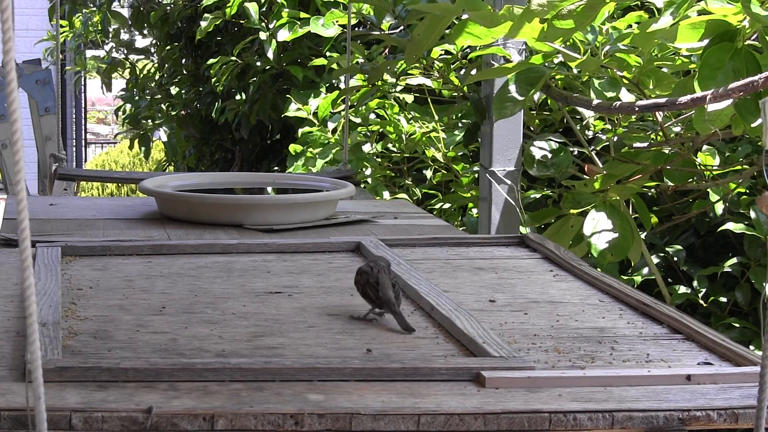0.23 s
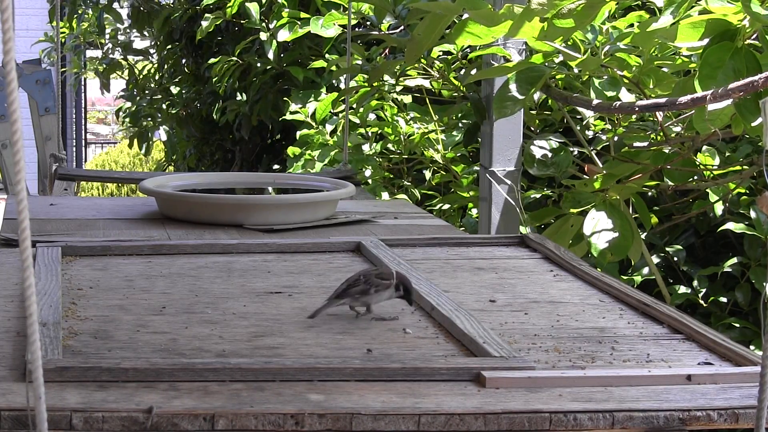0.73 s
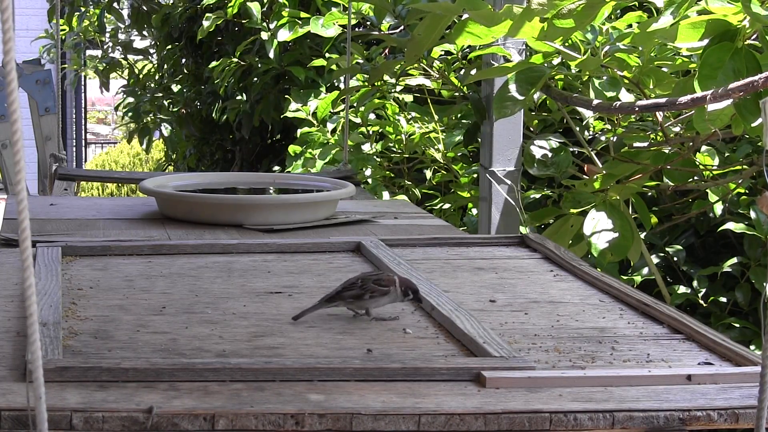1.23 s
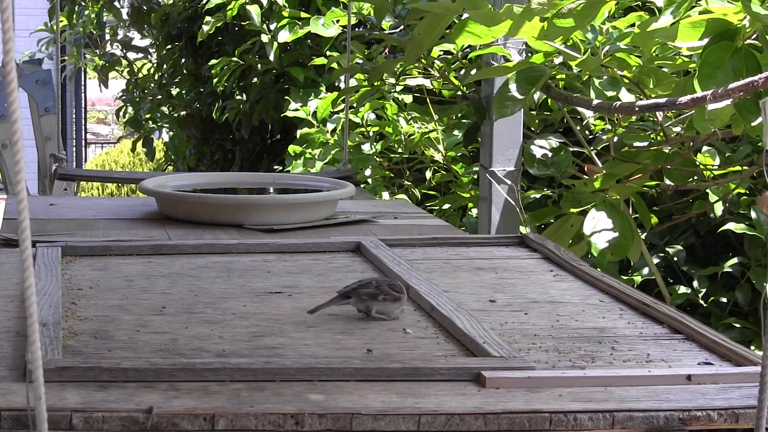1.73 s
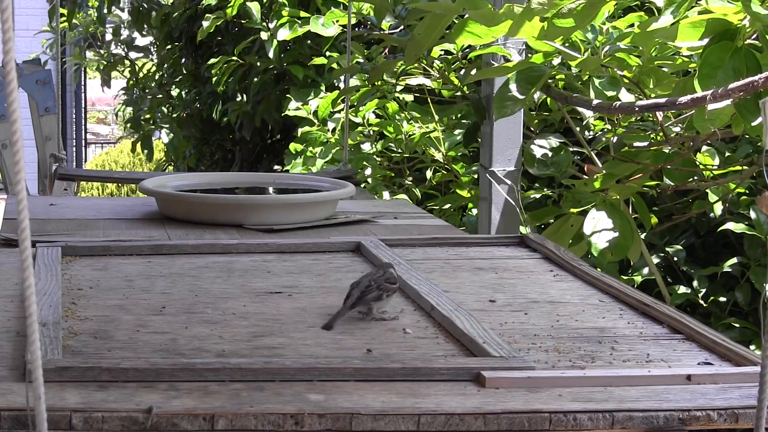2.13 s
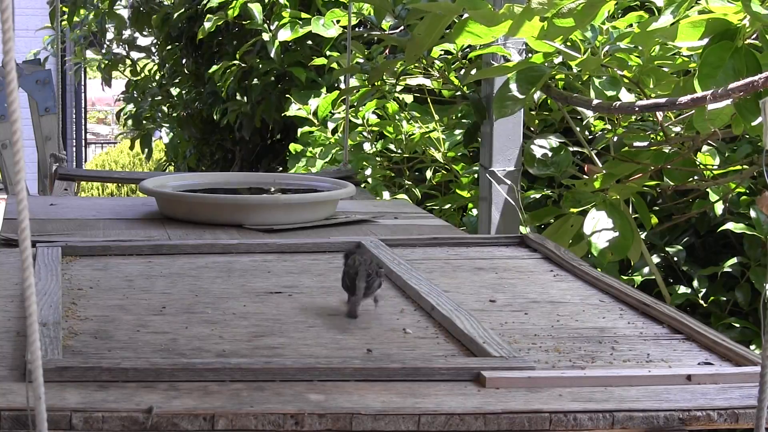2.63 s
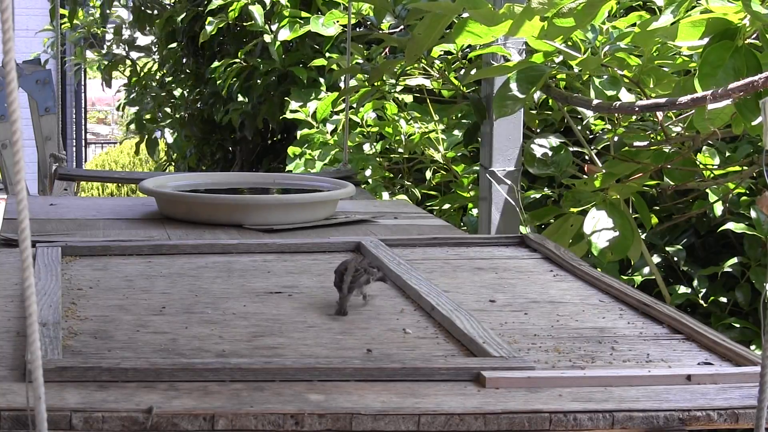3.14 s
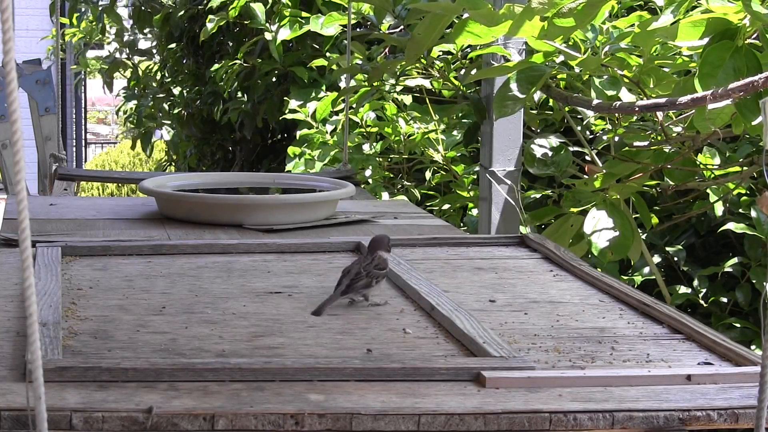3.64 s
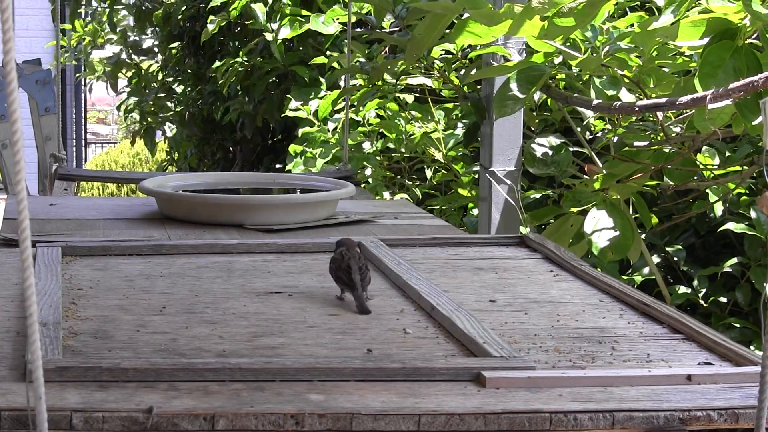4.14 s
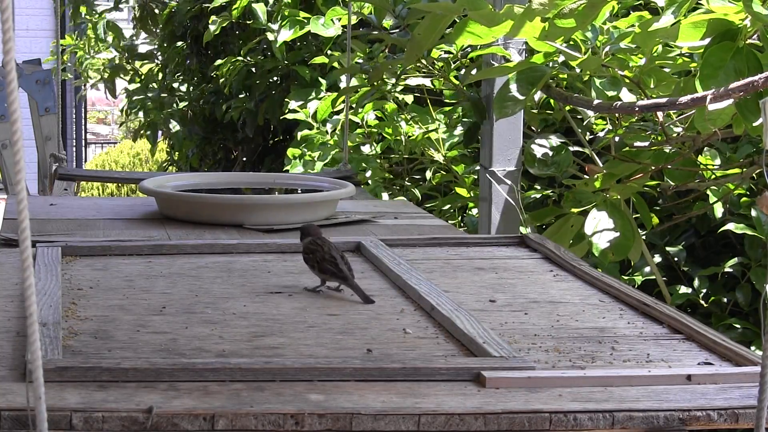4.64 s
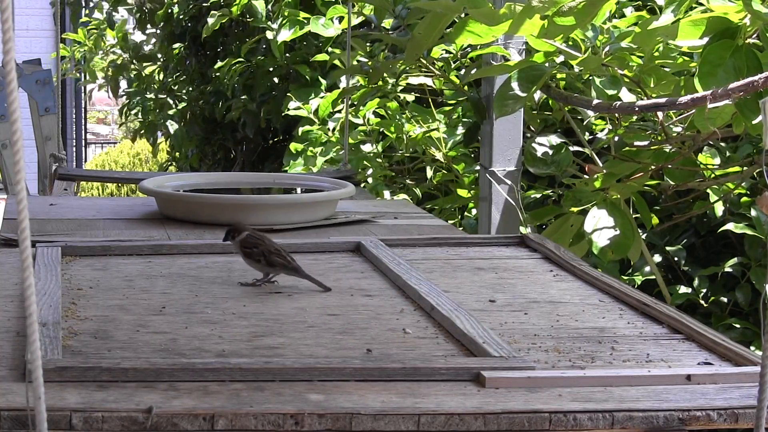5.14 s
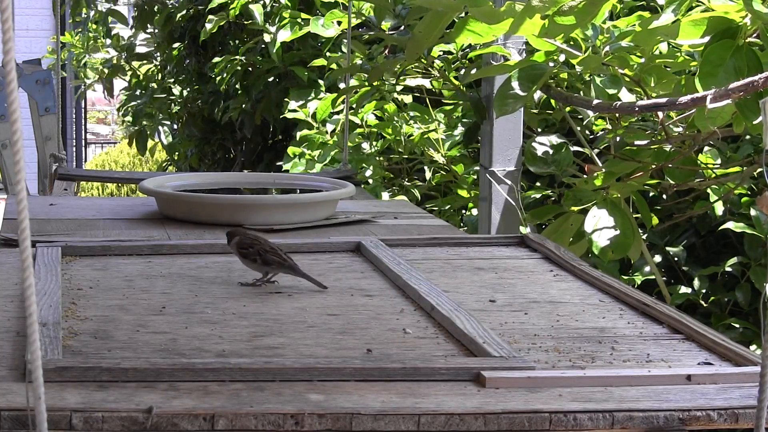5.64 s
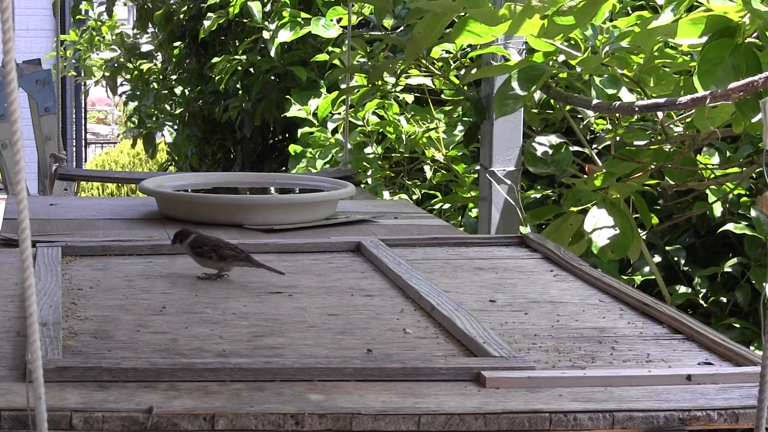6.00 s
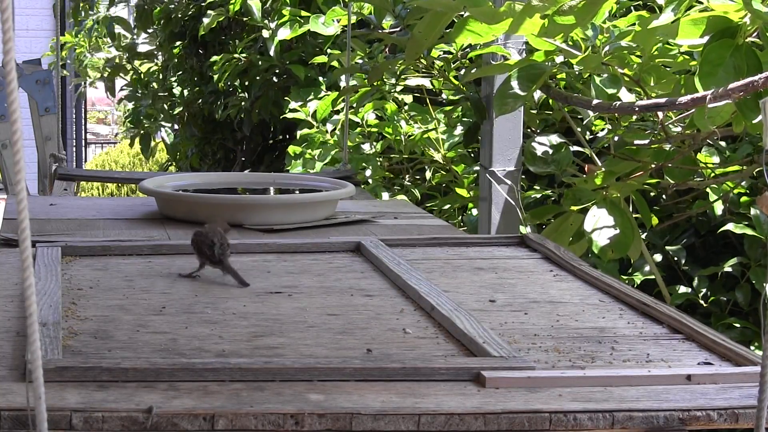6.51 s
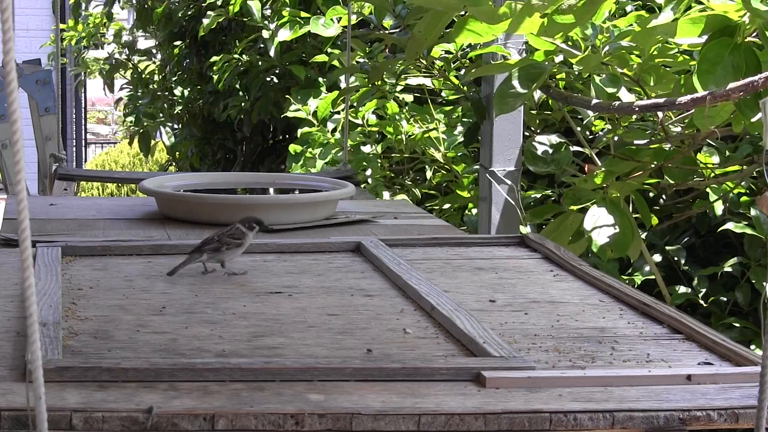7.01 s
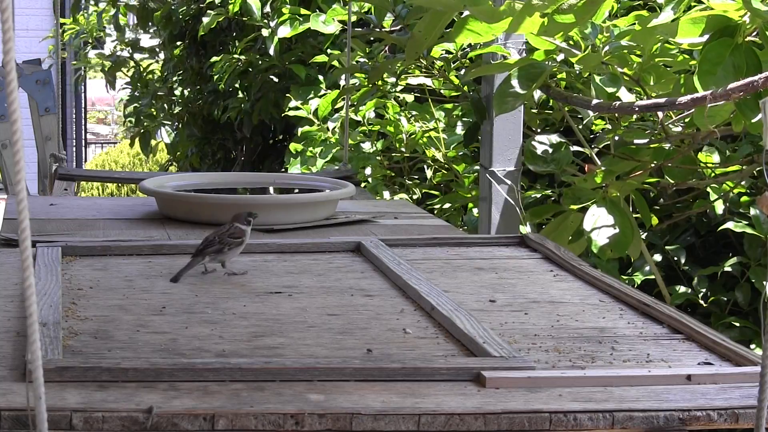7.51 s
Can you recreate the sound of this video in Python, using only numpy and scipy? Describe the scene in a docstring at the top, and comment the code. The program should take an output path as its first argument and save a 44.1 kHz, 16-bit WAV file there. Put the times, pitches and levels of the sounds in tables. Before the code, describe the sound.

A small sparrow gives six short, sharp, raspy chirps on a wooden garden hatch, with faint hopping taps and distant birds over soft traffic hush.

```python
"""Tree sparrow on a wooden hatch

A tree sparrow hops and pecks on a wooden hatch on a garden porch, giving six sharp chirps that ring between the boards.
Each chirp adds two rough gliding voices, one from each side of the syrinx (the bird's voice organ).
Other birds answer from the garden with one such voice each, mostly scattered. Taps are ringing wood and noise.
Behind them, shaped noise makes a low rumble, a swelling wash of far traffic and leaf hiss.
A pure tone makes a faint thin whine that dies away."""
import sys
import numpy as np
from scipy import signal
from scipy.fft import rfft, irfft, next_fast_len
from scipy.io import wavfile
from scipy.ndimage import map_coordinates

SR = 44100
rng = np.random.default_rng(int(sys.argv[2]) if len(sys.argv) > 2 else 0)


def inscribe(sig):
    """Save sig as 16-bit PCM at rate SR to the path in sys.argv[1].

    A 1-D sig is mono; a 2-D sig holds one channel per row.
    Samples are clipped to [-1, 1] before scaling.
    """
    pcm = np.round(np.clip(np.atleast_2d(sig).T, -1, 1) * 32767)
    wavfile.write(sys.argv[1], SR, pcm.astype(np.int16))


N = 342216  # length of the scene [samples]

# Rumble, traffic and leaf colours: (frequency [Hz], level [dB])
RUMBLE_COLOUR = [(20, -27.5), (33, -12.5), (50, -1), (85, 0), (135, 1.5), (250, -7.5), (500, -18),
                 (1500, -50)]
TRAFFIC_COLOUR = [(25, -34.5), (80, -10.5), (280, 3.5), (450, -2.5), (800, -1.5), (1400, -7), (2500, -17.5),
                  (5000, -22), (12000, -46.5)]
LEAF_COLOUR = [(60, -30), (500, -9.5), (2000, 4), (4000, 2), (6500, -1.5), (10000, -5), (13000, -7.5),
               (16000, -12)]
# How alike left and right are in all stereo noise: (frequency [Hz], likeness [0 to 1])
LEFT_RIGHT_LIKENESS = [(50, 0.97), (120, 0.99), (300, 0.56), (1000, 0.74), (4000, 0.77), (12000, .62)]
# Swells of the background: (peak time [s], half-length [s], rise [dB])
RUMBLE_SWELLS = [(3.7, .8, 3.9)]
TRAFFIC_SWELLS = [(2.7, 0.29, 2.2), (6.8, 2.1, 6.27)]
LEAF_GUSTS = [(0, .2, 4.5), (4.75, 0.85, 4.7), (7.3, 2, 3.8)]

# Beak and claws on the hatch; thump and tick are relative to the knock, before the trims in taps():
# (time [s], level [dB], thump [dB], tick [dB])
TAPS = [(0.2425, -53, -20, -7), (0.8242, -52.5, -9, -6.5), (1.5624, -43.5, -18, -19.5),
        (1.764, -46.5, -4, -18), (2.2873, -47, -8, -12.5), (3.041, -43, -13, -21.5),
        (3.3375, -47.5, 2.5, -17), (4.345, -40.5, -2.5, -17), (4.603, -53, -15, -5),
        (4.9664, -38.5, -2.5, -19), (5.928, -45, -3, -9.5), (5.995, -40.5, -3, -26),
        (6.381, -41.5, -7, -17), (6.8995, -40.5, 5.5, -35), (7.4214, -51.5, -11, -3)]
# Ringing tones of the wooden hatch: (frequency [Hz], level [dB], time to fall 60 dB [s])
HATCH_TONES = [(260, 1, 0.13), (310, -2, 0.19), (406, -4.5, 0.12), (457, -2, 0.088), (759, -13, .05),
               (1054, -9.5, .06), (1850, -10, 0.054)]
# Colours of the board's knock and the surface tick: (frequency [Hz], level [dB])
KNOCK_COLOUR = [(60, -40), (300, -4.5), (900, 0.5), (2000, 0), (3500, -5.5), (6000, -16.5), (15000, -35.5)]
TICK_COLOUR = [(200, -60), (1000, -25.5), (4000, -3.5), (8000, 3.5), (13000, -3), (16000, -6.5)]
# How long echoes last on the porch and in the garden: (frequency [Hz], time to fall 60 dB [s])
PORCH_DECAY = [(200, 0.22), (2000, 0.16), (3500, 0.15), (7000, 0.16), (14000, 0.12)]
GARDEN_DECAY = [(200, .4), (3800, 0.49), (7000, 0.26), (14000, .15)]

# Near calls of two kinds; the echo is relative to the call, the pan is left over right, the upper voice is
# relative to the lower, the swell is the rise over the call, and the fall is an extra drop in pitch:
# (time [s], level [dB], length [ratio], pitch [ratio], echo [dB], pan [dB], upper voice [dB],
#  swell [dB], fall [octaves])
CHIRPS = [(.331, -13, 1.008, 1.001, -7, 2.5, -2.5, -4, .01),
          (3.779, -19, 0.985, 0.97, -1.5, 0.9, -1.5, 3, 0.036),
          (6.520, -17, .985, 1.005, -2, 0.5, 2, -3.5, .02)]
CHIPS = [(2.669, -19, 1.01, 0.98, -3.5, 1.1, 0.35, -5, 0.01),
         (5.286, -22, 0.91, 1.037, -1, 1.1, 1, 5, -0.038),
         (7.665, -17, 1.03, 1.045, -3.5, 1.17, .5, -4, .12)]
# Turning points of the leading partial, before each call's stretch and pitch: (time from start [s], frequency [Hz])
CHIRP_GLIDE = [(.021, 4000), (.028, 5750), (.036, 6150), (.044, 4480), (.054, 3430), (.065, 3520),
               (.075, 4500), (.080, 3480), (.085, 3280), (.092, 2450), (.102, 3200), (.121, 1810)]
CHIP_GLIDE = [(0, 1951), (.016, 3830), (.023, 2463), (.028, 3370), (.037, 3658), (.047, 3030), (.061, 1753),
              (.078, 1170)]
TWEET_GLIDE = [(0, 3153), (.027, 2557), (.07, 3900), (.085, 3610)]
# The other side of the syrinx glides higher and more plainly: (time from start [s], frequency [Hz])
CHIRP_UPPER_GLIDE = [(0, 7100), (.026, 6350), (.053, 5200), (.091, 4350), (.116, 2850)]
CHIP_UPPER_GLIDE = [(0, 3060), (.012, 4750), (.033, 4206), (.056, 3780), (.066, 2200), (.075, 1510)]
# Short pushes of air in the lower voice, before the call's stretch: (time from start [s], rise [dB])
CHIRP_ACCENTS = [(.034, 8.5), (.045, 11.5), (.053, 5), (.071, 10.5), (.082, 17), (.101, 11.5)]
CHIP_ACCENTS = [(.016, 8), (.030, 10), (.037, 16), (.047, 11)]
# Harmonics 1 to 6 of a voice, the second leading, before throat and undertone: (level [dB])
PURE = [-40, 0, -19.5, -14, -33.5, -44]
REEDY = [-18, 2.5, -22.5, -22, -32, -29]
HOARSE = [-5, 1, -18, -22, -30, -30]
# How freely the fundamental sounds, before trim and wobble: (leading frequency [Hz], level [dB])
UNDERTONE = [(2800, 1), (3400, -7.5), (4300, 3), (5300, -18)]
# What the throat and open beak let through: (frequency [Hz], level [dB])
THROAT = [(500, -32.5), (1200, -9), (2000, -7), (3200, -3.5), (4400, -2.5), (5200, -7), (6200, -8.5),
          (7000, -14), (10000, -16.5), (15000, -24.5)]
# Colour of the air in a call: (frequency [Hz], level [dB])
RASP_COLOUR = [(800, -25.5), (2500, -4), (4000, 5), (6000, -4), (9000, -9.5), (12500, -16), (16000, -25.5)]

# Soft scuffs: (time [s], length [s], level [dB])
SCUFFS = [(.83, .15, -62), (1.553, 0.15, -55.5), (2.372, .29, -53), (5.21, 0.06, -54.5)]
# Colour of a scuff: (frequency [Hz], level [dB])
SCUFF_COLOUR = [(40, -50), (180, 1), (350, -1), (600, 4.5), (1200, -3.5), (1800, -1), (2600, -8.5),
                (3500, -18.5), (8000, -37)]

# Far calls: (time [s], level [dB], length [ratio], pitch [ratio])
FAR_CHIRPS = [(1.568, -44.5, 1.1, 1.03), (3.955, -44.5, 1.1, 1.06)]
FAR_TWEETS = [(2.085, -66, 0.88, 1.06), (5.59, -52, 1.03, 1.001), (7.04, -54.5, 1.01, 1.001)]

# Voice settings; times are before the call's stretch, jitter is the pitch tremble as a fraction,
# and shimmer is the loudness tremble
CHIRP_LOW = dict(glide=CHIRP_GLIDE, accents=CHIRP_ACCENTS, partials=REEDY, attack_s=.003, hold_db=-13,
                 release_s=.011, jitter=.022, shimmer_db=2.5, rasp_db=-24.5)
CHIRP_HIGH = dict(glide=CHIRP_UPPER_GLIDE, accents=[], partials=PURE, attack_s=.058, hold_db=-12,
                  release_s=.028, jitter=.06, shimmer_db=3, rasp_db=-20)
CHIP_LOW = dict(glide=CHIP_GLIDE, accents=CHIP_ACCENTS, partials=PURE, attack_s=.0133, hold_db=-11,
                release_s=.028, jitter=.0308, shimmer_db=2.7, rasp_db=-25.5)
CHIP_HIGH = dict(glide=CHIP_UPPER_GLIDE, accents=[], partials=PURE, attack_s=.017, hold_db=-8,
                 release_s=.017, jitter=.052, shimmer_db=3.5, rasp_db=-21)
FAR_CHIRP = dict(glide=CHIRP_GLIDE[:8], accents=[], partials=PURE, attack_s=.0031, hold_db=1.5,
                 release_s=.0036, jitter=.065, shimmer_db=1.5, rasp_db=-18)
FAR_TWEET = dict(glide=TWEET_GLIDE, accents=[], partials=HOARSE, attack_s=.01, hold_db=.3,
                 release_s=.017, jitter=.13, shimmer_db=3, rasp_db=-12)
ACCENT_S, FADE_DB = .0034, 15  # half-length of an air push; depth of each attack and release
CALL_S, TAIL_S = .16, .45  # time set aside for a call, and for its echo after it
RUMBLE_DB, TRAFFIC_DB, LEAVES_DB = -61, -61, -65  # resting levels, before swells, wavering and tilt
WHINE_HZ, WHINE_DB, WHINE_END_S, WHINE_FADE_DB_PER_S = 12769, -82.5, 4.5, 25  # the fade begins at WHINE_END_S
TOP_HZ = 15800  # nothing at or above this is kept


def amp(db):
    """Turn decibels into a multiplier."""
    return 10 ** (np.asarray(db) / 20)


def unit(x):
    """Scale x to an average strength (rms) of 1."""
    return x / np.sqrt(np.mean(x ** 2) + 1e-20)


def along(points, hz):
    """Read a curve of (Hz, value) points, joined by straight lines on a log frequency axis."""
    f, value = np.transpose(points)
    return np.interp(np.log(hz + 1), np.log(f + 1), value)


def wobble(rate, size):
    """Draw a smooth random curve through rate random points a second."""
    knots = rng.standard_normal(int(size * rate / SR) + 4)
    return map_coordinates(knots, [np.arange(size) * rate / SR])


def filtered(x, response):
    """Make each frequency of x stronger or weaker by response(hz)."""
    n = x.shape[-1]
    padded = next_fast_len(n + 8192)
    hz = np.fft.rfftfreq(padded, 1 / SR)
    return irfft(rfft(x, padded) * response(hz), padded)[..., :n]


def add(out, s, x):
    """Mix x into out from time s on."""
    i = max(round(s * SR), 0)
    out[:, i:i + x.shape[-1]] += x[..., :max(N - i, 0)]


def noise(colour, size):
    """Make coloured noise of rms 1 whose left and right are partly alike."""
    def response(hz):
        turn = np.arccos(np.clip(along(LEFT_RIGHT_LIKENESS, hz), -1, 1)) / 2
        return amp(along(colour, hz)) * [np.cos(turn), np.sin(turn)]  # shares for mid and side
    mid, side = filtered(rng.standard_normal((2, size)), response)
    return unit(np.array([mid + side, mid - side]))


def echo(x, decay, width, gap):
    """Smear x with fading stereo noise: a scattered answer as strong as x and gap seconds late."""
    hz, t, grains = signal.stft(rng.standard_normal((2, SR // 2)), SR, nperseg=256)
    fading = grains * amp(-60 * t / along(decay, hz)[:, None])
    mid, side = signal.istft(fading, SR, nperseg=256)[1]
    tail = np.pad([mid + width * side, mid - width * side], ((0, 0), (int(abs(gap) * SR), 0)))
    answer = signal.fftconvolve(np.atleast_2d(x), tail, axes=1)[:, :x.shape[-1]]
    return unit(answer) * np.sqrt(np.mean(x ** 2))


def bell(t, peak, width):
    """Rise smoothly to 1 at the peak and fall back."""
    return np.exp(-((t - peak) / width) ** 2)


def swells(rows, t):
    """Add up the rises in dB of a table of swells."""
    return sum(db * bell(t, peak, width) for peak, width, db in rows)


def background():
    """Rumble, far traffic and leaves are noises that waver separately; a thin whine dies away."""
    t = np.arange(N) / SR
    rumble_db = RUMBLE_DB + swells(RUMBLE_SWELLS, t) + 1.2 * wobble(11, N)
    traffic_db = TRAFFIC_DB + swells(TRAFFIC_SWELLS, t) + .45 * wobble(3.3, N)
    leaves_db = LEAVES_DB + swells(LEAF_GUSTS, t) + .3 * wobble(5, N)
    rumble = amp(rumble_db) * noise(RUMBLE_COLOUR, N)
    traffic = amp(traffic_db) * noise(TRAFFIC_COLOUR, N)
    leaves = amp(leaves_db) * noise(LEAF_COLOUR, N)
    whine_db = WHINE_DB - WHINE_FADE_DB_PER_S * np.maximum(t - WHINE_END_S, 0)
    whine = amp(whine_db) * np.sqrt(2) * np.sin(2 * np.pi * WHINE_HZ * t)
    tilt = amp([[-.5], [.5]])  # slightly stronger on the right
    return (rumble + traffic) * tilt + leaves + whine


def taps():
    """Each peck or hop ticks on the surface, knocks the board and makes the whole hatch ring."""
    out, t = np.zeros((2, N)), np.arange(SR // 3) / SR
    for s, db, thump_db, tick_db in TAPS:
        ring = 0
        for hz, level, t60 in HATCH_TONES:
            start_phase = rng.uniform(0, 2 * np.pi)
            ring = ring + amp(level - 60 * t / t60) * np.sin(2 * np.pi * hz * t + start_phase)
        thump = amp(thump_db - 8) * ring * (1 - np.exp(-t / .0014))  # soft start
        knock = amp(-6.5 - 60 * t / .06) * noise(KNOCK_COLOUR, len(t))
        tick = amp(tick_db + 3.5 - 60 * t / .033) * noise(TICK_COLOUR, len(t))
        hit = amp(db) * (thump + knock + tick)
        add(out, s, hit + amp(-4.5) * echo(hit, PORCH_DECAY, width=.4, gap=.004))
    return out


def voice(length, pitch, glide, accents, partials, attack_s, hold_db, release_s, jitter, shimmer_db, rasp_db):
    """One side of the syrinx: a trembling harmonic glide shaped by the throat, with a rasp of air."""
    t = np.arange(int(CALL_S * SR)) / SR / length
    turns, turn_hz = np.transpose(glide)
    hz = pitch * np.interp(t, turns, turn_hz) * (1 + jitter * wobble(800, len(t)))
    phase = 2 * np.pi * np.cumsum(hz) / SR

    since, left = t - turns[0], turns[-1] - t
    gate = np.clip(np.minimum(since, left) / .003, 0, 1)  # silent outside the glide
    fade = np.clip(1 - since / attack_s, 0, 1) + np.clip(1 - left / release_s, 0, 1)
    pushes_db = sum(db * bell(t, s, ACCENT_S) for s, db in accents)
    effort_db = hold_db - FADE_DB * fade + pushes_db

    # the fundamental comes and goes, and weakens on the highest notes
    under_db = along(UNDERTONE, hz) + 4.5 * wobble(250, len(t)) - 1.2
    tone = 0
    for k, level in enumerate(partials, 1):
        partial_hz = k / 2 * hz  # hz belongs to the second harmonic
        level_db = level + (k == 1) * under_db + along(THROAT, partial_hz)
        tone = tone + amp(level_db) * (partial_hz < SR / 2) * np.sin(k / 2 * phase)
    air = amp(rasp_db) * noise(RASP_COLOUR, len(t))[0]
    loudness = amp(effort_db + shimmer_db * wobble(400, len(t)))
    return gate * loudness * (np.sqrt(2) * tone + air)


def sparrow(calls, lower, upper, garden_db):
    """Near calls: both voices heard directly, the quick ring of the porch and a faint garden tail."""
    out = np.zeros((2, N))
    t = np.arange(int(CALL_S * SR)) / SR
    progress = np.minimum(t / lower["glide"][-1][0], 1) - .5  # zero at the middle of the unstretched call
    for s, db, length, pitch, echo_db, pan_db, upper_db, swell_db, fall in calls:
        bend = pitch * 2 ** (-fall * progress)
        voices = voice(length, bend, **lower) + amp(upper_db) * voice(length, bend, **upper)
        call = np.pad(amp(swell_db * progress) * voices, (0, int(TAIL_S * SR)))
        porch = echo(call, PORCH_DECAY, width=.26, gap=.003)
        garden = echo(call, GARDEN_DECAY, width=.388, gap=.024)
        room = porch + amp(garden_db) * garden
        sides = amp([[db + pan_db / 2], [db - pan_db / 2]])
        add(out, s, sides * (call + amp(echo_db) * room))
    return out


def scuffs():
    """Brief uneven rubbing noises that swell quickly and fade."""
    out = np.zeros((2, N))
    for s, length, db in SCUFFS:
        u = np.linspace(0, 1, int(length * SR))
        swell = np.abs(np.sin(np.pi * u ** .5))  # peaks a quarter of the way in
        uneven = amp(db + 2.6 * wobble(90, len(u)))
        add(out, s, uneven * swell * noise(SCUFF_COLOUR, len(u)))
    return out


def garden_birds(calls, song, direct_db):
    """Far calls: one voice each, arriving mostly scattered by the garden."""
    out = np.zeros((2, N))
    for s, db, length, pitch in calls:
        call = np.pad(voice(length, pitch, **song), (0, int(TAIL_S * SR)))
        scattered = echo(call, GARDEN_DECAY, width=.39, gap=.0021)
        add(out, s, amp(db) * (amp(direct_db) * call + scattered))
    return out


def scene():
    """The sparrow and its footwork in front, other birds and the garden behind."""
    behind = background()
    footwork = taps()
    chirps = sparrow(CHIRPS, CHIRP_LOW, CHIRP_HIGH, garden_db=-19.5)
    rubbing = scuffs()
    answers = garden_birds(FAR_CHIRPS, FAR_CHIRP, direct_db=-9)
    tweets = garden_birds(FAR_TWEETS, FAR_TWEET, direct_db=-2)
    chips = sparrow(CHIPS, CHIP_LOW, CHIP_HIGH, garden_db=-17.5)
    return behind + footwork + chirps + rubbing + answers + tweets + chips


def record(dry):
    """Cut off the highest treble sharply at the top frequency."""
    return filtered(dry, lambda hz: hz < TOP_HZ)


dry = scene()
out = record(dry)
inscribe(out)
```